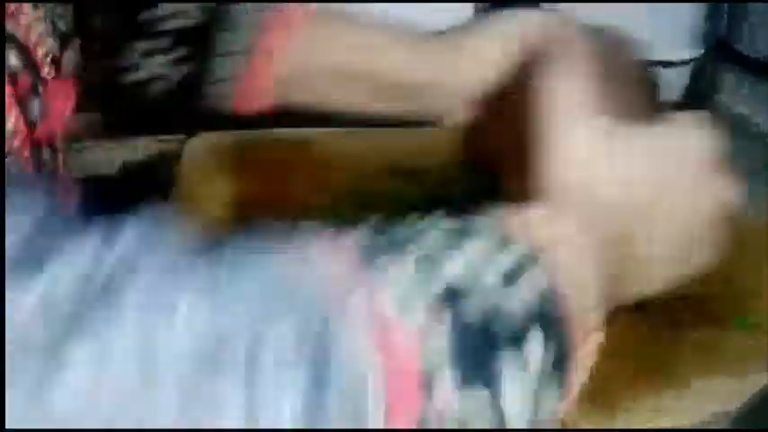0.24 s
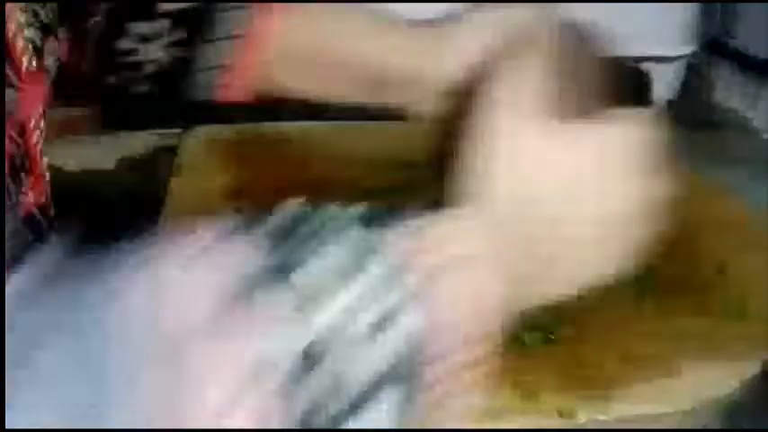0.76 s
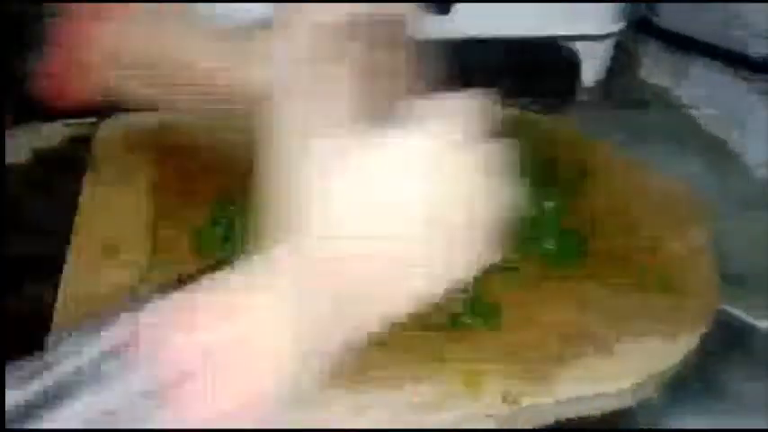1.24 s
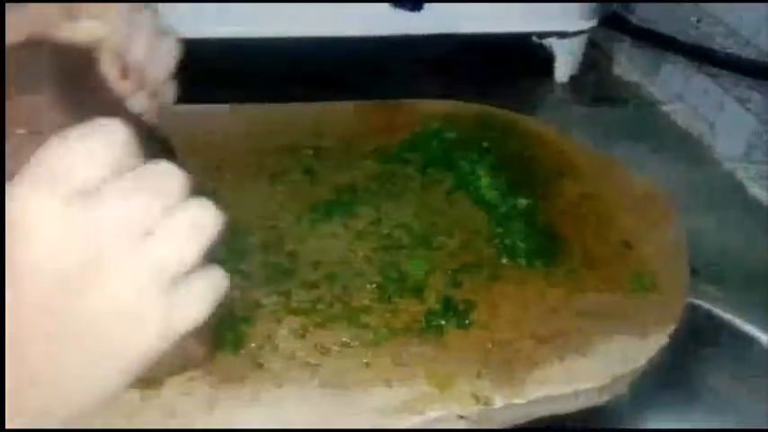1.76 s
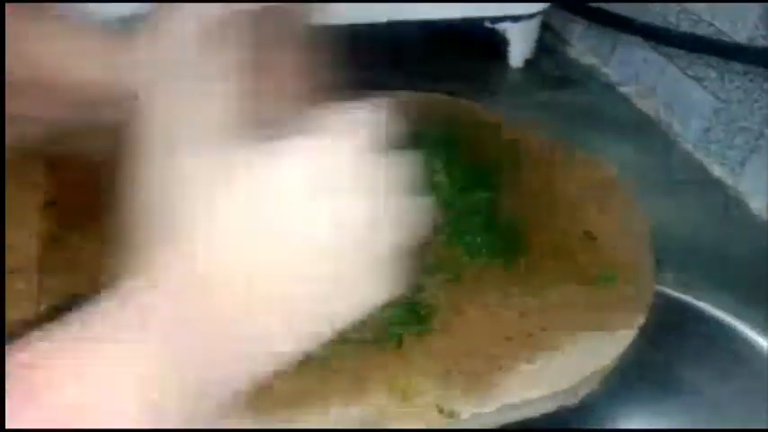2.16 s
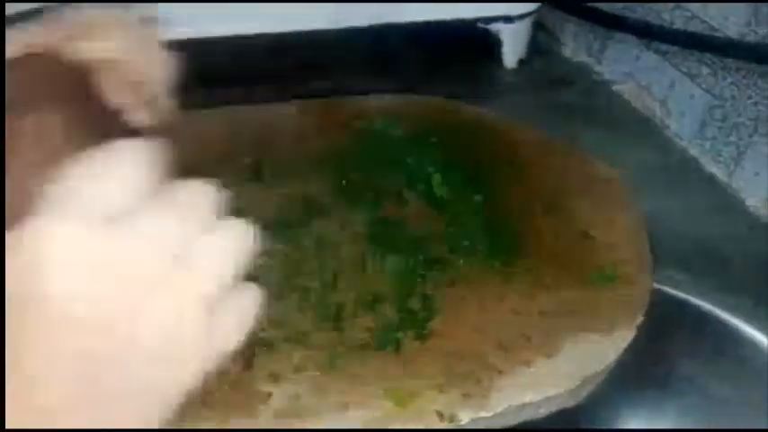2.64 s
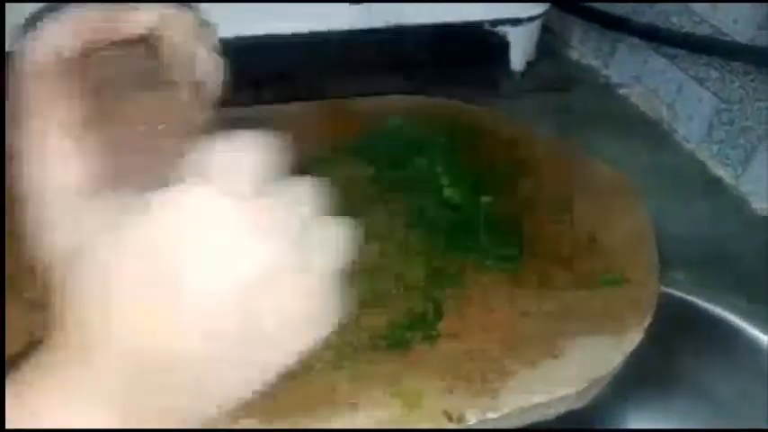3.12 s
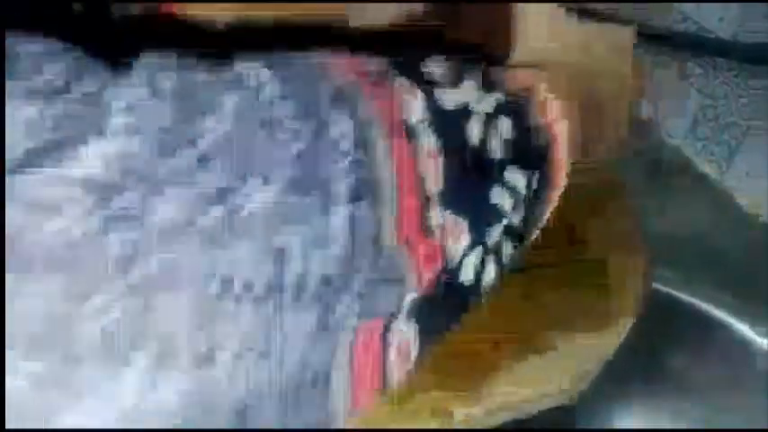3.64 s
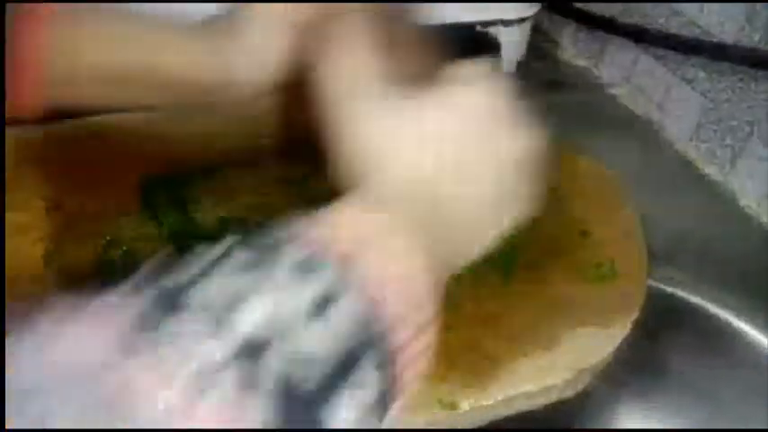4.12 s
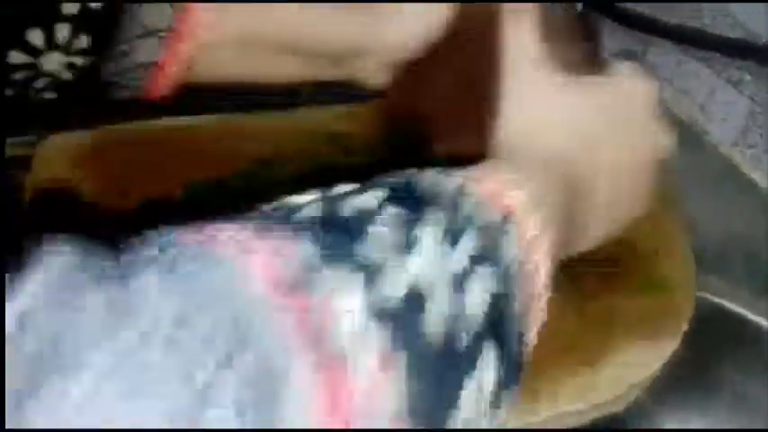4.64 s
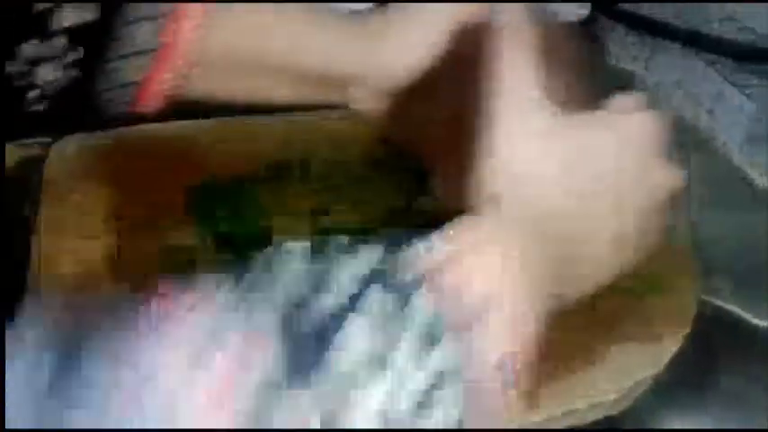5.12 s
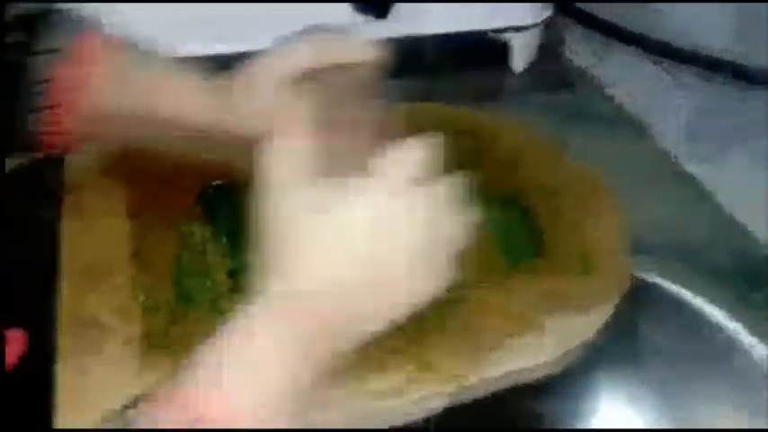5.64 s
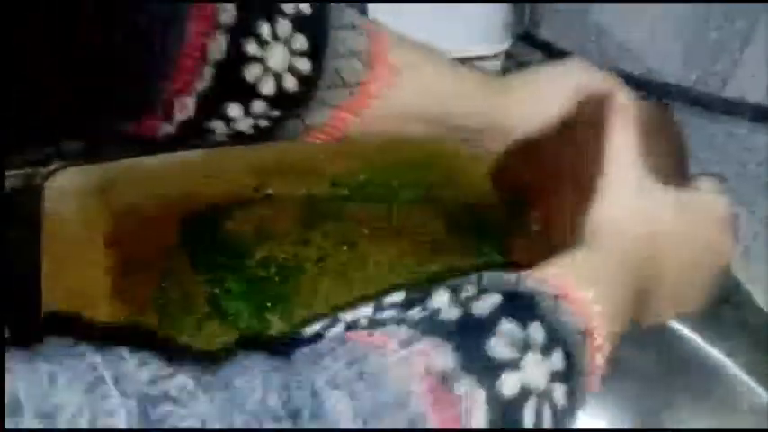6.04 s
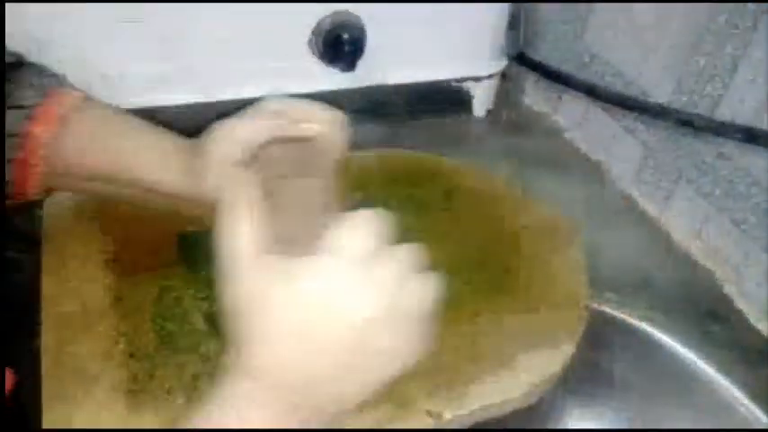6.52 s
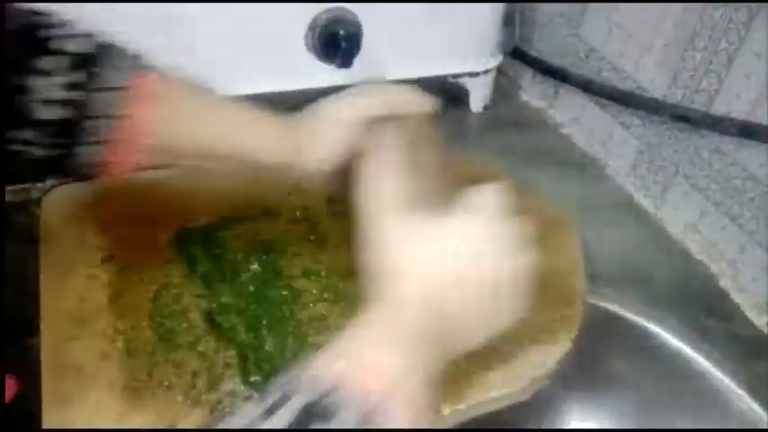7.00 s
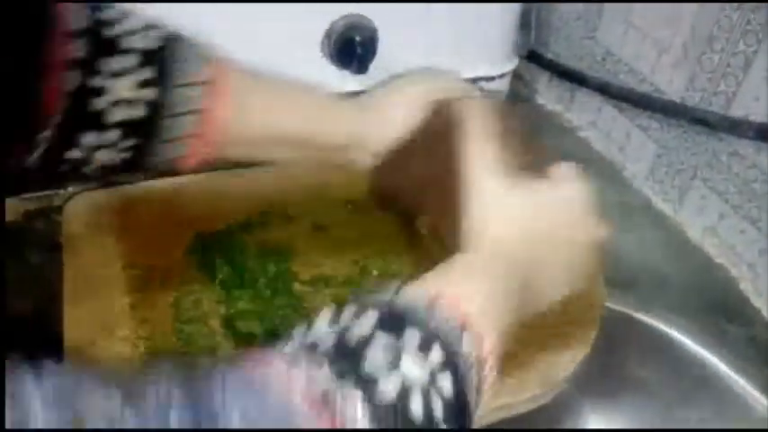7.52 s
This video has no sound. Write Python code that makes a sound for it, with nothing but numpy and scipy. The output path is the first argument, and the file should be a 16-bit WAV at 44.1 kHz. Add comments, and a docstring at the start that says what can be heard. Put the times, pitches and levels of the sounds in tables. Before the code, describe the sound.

Quick rough grinding strokes of stone over wet herbs on a heavy slab, with pauses, sharp stony clacks and small bright ticks.

```python
"""On a kitchen floor, close to a phone, a hand stone is pushed to and fro over wet herbs on a thick stone slab.
Crushed grit hisses as filtered noise and clicks; its jerky slips make the slab and the stone ring.
Now and then the stone is lifted and knocked down, and short ticks sound as bursts of bright noise.
The small hard room adds short, dull echoes; behind lie a low rumble, a faint hiss, a hoot and a rustle."""
import sys
import numpy as np
from scipy import signal
from scipy.fft import rfft, irfft, next_fast_len
from scipy.io import wavfile
from scipy.ndimage import uniform_filter1d

SR = 44100
rng = np.random.default_rng(int(sys.argv[2]) if len(sys.argv) > 2 else 0)


def bounce(signal):
    """Save signal as a 16-bit WAV file at the path given by the first command-line argument."""
    frames = np.transpose(np.atleast_2d(signal))
    limited = np.clip(frames, -1, 1)
    pcm = np.round(limited * 32767).astype(np.int16)
    wavfile.write(sys.argv[1], SR, pcm)


N = 342216

# One row per stroke of the stone: start t/s, speeding up t/s, steady t/s, slowing t/s;
# strongest slab boom, slab ring, stone ring, each t/s after the start;
# greatest force on grit, boom, slab ring, stone ring, each level/dB
STROKES = [(-0.021, 0.047, 0.0063, 0.11, 0.094, 0.087, 0.077, -47, -34.5, -49, -58.4),
           (0.146, 0.092, 0.0, 0.098, 0.061, 0.028, 0.17, -47, -34, -43.5, -52),
           (0.35, 0.098, 0.009, 0.08, 0.1, 0.13, 0.18, -47.5, -36, -48, -54),
           (0.555, 0.089, 0.0082, 0.12, 0.086, 0.05, 0.045, -48, -36.5, -44.7, -48),
           (0.776, 0.087, 0.0, 0.093, 0.054, 0.11, 0.12, -47, -34.5, -46.5, -53.5),
           (0.968, 0.039, 0.015, 0.085, -0.04, 0.0083, 0.013, -60.5, -49, -59, -72),
           (1.439, 0.071, 0.033, 0.15, 0.14, 0.057, 0.065, -48.3, -37, -47.5, -49),
           (1.703, 0.1, 0.0013, 0.08, 0.18, 0.14, 0.12, -45, -38.5, -51, -61),
           (1.89, 0.093, 0.023, 0.1, 0.13, 0.06, 0.05, -47, -39.5, -48.5, -53),
           (2.13, 0.0044, 0.08, 0.091, 0.078, 0.13, 0.11, -49.5, -39.5, -52.5, -58.5),
           (2.295, 0.073, 0.044, 0.098, 0.16, 0.098, 0.034, -49.5, -34.5, -48.5, -55.4),
           (2.514, 0.1, 0.0088, 0.098, 0.026, 0.14, 0.15, -49.5, -32.5, -53.5, -58.5),
           (2.66, 0.1, 0.0066, 0.026, -0.014, 0.033, 0.033, -67, -56.5, -73, -82),
           (3.254, 0.18, 0.055, 0.017, 0.1, 0.12, 0.066, -63, -42, -56.5, -53),
           (3.474, 0.04, 0.0046, 0.1, -0.019, 0.007, 0.07, -57.5, -59, -67, -71),
           (3.595, 0.056, 0.11, 0.057, 0.13, 0.14, 0.17, -54, -44.5, -57.5, -57),
           (3.867, 0.064, 0.0045, 0.18, 0.1, 0.13, 0.021, -49.5, -42, -55.7, -54.5),
           (4.03, 0.11, 0.0084, 0.127, 0.16, 0.15, 0.16, -50.5, -39, -55.5, -53),
           (4.269, 0.13, 0.0079, 0.1, 0.035, 0.054, 0.048, -51, -34.5, -51.5, -51.5),
           (4.496, 0.011, 0.11, 0.11, -0.1, 0.091, 0.13, -52, -34.7, -53, -57.8),
           (4.706, 0.13, 0.024, 0.1, 0.054, 0.14, 0.13, -49.5, -34, -56.5, -60),
           (4.946, 0.036, 0.046, 0.13, 0.14, 0.078, 0.11, -52, -38.5, -62.5, -61.8),
           (5.14, 0.07, 0.029, 0.11, 0.104, 0.135, 0.091, -52.5, -48.5, -63.5, -63.5),
           (5.314, 0.022, 0.0, 0.1, 0.00068, 0.002, 0.028, -58.5, -48.8, -69, -79),
           (5.694, 0.19, 0.0, 0.19, 0.2, 0.15, 0.097, -48, -36.5, -39.5, -44),
           (5.943, 0.051, 0.0046, 0.12, -0.039, 0.13, 0.019, -53.9, -35, -63, -58),
           (6.085, 0.09, 0.03, 0.11, 0.11, 0.17, 0.15, -50.5, -36.5, -47, -51.5),
           (6.318, 0.078, 0.063, 0.072, 0.17, 0.052, 0.04, -53, -35, -46.5, -50.5),
           (6.501, 0.09, 0.012, 0.17, 0.14, 0.12, 0.15, -50, -36, -49.5, -52),
           (6.739, 0.15, 0.018, 0.057, 0.09, 0.15, 0.062, -47, -32.5, -51.5, -49.5),
           (6.948, 0.032, 0.089, 0.081, 0.099, 0.096, 0.1, -50.3, -34, -51, -58),
           (7.085, 0.062, 0.026, 0.17, 0.16, 0.15, 0.165, -52, -43, -61.5, -61.5),
           (7.347, 0.075, 0.013, 0.14, 0.0043, 0.091, 0.028, -53.5, -41.1, -61.5, -59),
           (7.525, 0.04, 0.019, 0.18, 0.16, 0.12, 0.12, -54.5, -43, -56.5, -63)]
# The stone's edge drags dry and crunches: start t/s, swell t/s, fade t/s,
# force on the lower pair of modes level/dB, on the upper pair level/dB
CRUNCHES = [(5.73, 0.076, 0.22, -51, -55), (6.325, 0.04, 0.029, -65, -64)]
# The stone meets the slab: t/s, push below the split level/dB, push above it level/dB,
# boom push level/dB, crack level/dB, fading of the rattle t/ms
KNOCKS = [(0.442, -38, -38, -29, -33, 8.9), (1.353, -5, -4, -13, -23.5, 3.6),
          (1.483, -25, -27, -28.5, -57, 6.7), (2.418, -55.5, -49, -31, -52, 5.1),
          (3.113, -15.5, -16, -21, -35.5, 3.4), (3.304, -52, -57.5, -43.5, -50, 5),
          (4.765, -42.5, -44, -26.5, -44.5, 2.3), (5.654, -8, -12, -11.5, -29, 4.4),
          (6.374, -25, -24.5, -28, -57, 4.2), (7.021, -44, -41.5, -33, -45, 6.3)]
# Short bright ticks: t/s, level/dB
TICKS = [(0.587, -52), (1.3238, -48.5), (1.7976, -49), (2.135, -58), (2.324, -61), (2.472, -48),
         (2.576, -51.5), (3.623, -48.5), (4.304, -59), (4.505, -46), (4.863, -37.5), (4.968, -48),
         (7.4185, -50), (7.5574, -43.5)]
# Ringing modes: f/Hz, knocked level/dB, rubbed level/dB, time to fall 60 dB before extra damping t/s
SLAB_BOOM = [(128, -28.5, -18.5, 0.44), (185.6, -6, -1, 0.42), (229.4, 2, 2, 0.19), (291, -1, -10.5, 0.084),
             (335.3, -4.5, -13, 0.17), (387.6, -2.5, -15, 0.38), (452.3, -10.5, -19, 0.17)]  # low modes of the slab
SLAB_RING = [(591.5, -16.5, -6, 0.053), (721, -5.5, -12.5, 0.083), (799, -15.5, -4, 0.049),
             (859, -6, 0, 0.052), (967, -2.5, -4.5, 0.064), (1039, 0, -7.5, 0.1), (1209, -5, -16.5, 0.14),
             (1313, 4, -18.5, 0.16), (1524, -12.5, -14.5, 0.2), (1590, 4, -12.5, 0.25),
             (1664, -7, -1, 0.042), (1754, -9.5, -15, 0.035)]  # middle modes of the slab
STONE_RING = [(1908, 2.5, -8, 0.12), (2073, -11.5, -10, 0.13), (2225, -11.5, -2.5, 0.086),
              (2300, -15.5, 0, 0.068), (2417, -11.5, -9, 0.085), (2735, -22, -15.5, 0.027),
              (3030, -19.5, -10.5, 0.051), (3260, -28.5, -10, 0.046), (3695, -27.5, -7.5, 0.039)]  # modes of the hand stone
# Modes of the dragging edge: f/Hz, level/dB, time to fall 60 dB before extra damping t/s
EDGE_LOW = [(3140, 0, .02), (3460, -2, 0.023)]
EDGE_HIGH = [(6200, -2, 0.016), (5970, 0, 0.0141)]
# Modes of the background hum: f/Hz, level/dB, time to fall 60 dB before extra damping t/s
HUM_MODES = [(66, 0, .5), (100, -4, .5)]
# Tone colour as a filter curve: f/Hz, level/dB
GRIT_COLOUR = [(290, -40), (500, -2.5), (682, -25), (850, -3.5), (1320, -11), (1620, 4.5), (2270, -20.5),
               (2580, -5), (5610, -2.5), (9670, -4), (11000, -8.5), (14300, -12), (22000, -120)]
THUD_COLOUR = [(260, -27), (450, -16), (578, -12), (834, 1.5), (1150, 6), (1610, 3.5), (2000, -15),
               (2180, -12.5), (2380, -24), (4500, -45), (5850, -59.5), (9900, -120)]
AIR_COLOUR = [(24, -40), (40, -14.5), (107, -18), (139, -12), (156, -25), (193, -22), (494, -39),
              (720, -39), (978, -35.5), (2390, -41), (2560, -39.5), (2810, -45.5), (5970, -51.5),
              (7380, -44), (11000, -67.5), (14300, -100), (22000, -120)]  # the faint background hiss, strongest in the bass
# The hoot's tone and overtones: multiple of its lowest frequency, level/dB
HOOT_ORDERS = [(1, 2.5), (2, -9.5), (3, -20.5)]
# The stone's sound drops abruptly once, ring and all: t/s, level/dB
DROP = [(7.086, -1.5), (7.096, -16), (7.15, -8), (7.19, -6)]
# Background loudness over time: t/s, level/dB
AIR_LEVEL = [(0, -56), (1.2, -64.5), (2.95, -67.5), (5.55, -62.5), (7.76, -59)]
WOBBLE_LEVEL = [(0.0, -53), (0.24, -67), (1.58, -49), (1.79, -63), (2.9, -71), (3.0, -55.5), (3.28, -79),
                (3.57, -61.5), (5.81, -57.5), (6.33, -62), (6.74, -46), (7.15, -70), (7.41, -64),
                (7.76, -65)]  # the deepest wobble
HUM_LEVEL = [(0.0, -69), (0.37, -62), (1.32, -62.5), (1.36, -51), (1.49, -65), (2.64, -64), (2.83, -80),
             (3.11, -66), (3.31, -78), (3.69, -69), (4.56, -70), (4.65, -60), (5.47, -70), (5.75, -51.5),
             (6.09, -56.5), (6.16, -66), (7.22, -52.5), (7.33, -66), (7.5, -48.5), (7.76, -64)]

# how steeply each sound follows the speed (exponent)
HISS_POWER, BOOM_POWER, RING_POWER, STONE_POWER = 2.52, 1.5, 1.1, 0.97
# boom, slab ring and stone ring each swell once a stroke: width in s, depth in dB
SWELL_S, SWELL_DB = (.06, 0.048, .05), (9.5, 11, 12)
# centre of the lifted part of the hiss at rest and at full speed; share it sinks by while the stone rings
SLOW_GRIT_HZ, FAST_GRIT_HZ, RING_DULLS = 4860, 6230, .15
ROOM_T60_S, ROOM_TOP_HZ, ROOM_DB = 0.42, 2500., -18
# middle of the sound, time from there to 1/e of its strength
HOOT_S, HOOT_WIDTH_S, HOOT_HZ, HOOT_DB = 3.035, .04, 1000, -66.5
RUSTLE_S, RUSTLE_WIDTH_S, RUSTLE_DB = 1.2, .05, -72.5
TOP_HZ = 10950


def grinding():
    """Fine grit hisses straight to the air; coarser slips shake slab and stone."""
    edge_low_db, edge_high_db = crunch()
    (hiss_db, boom_db, ring_db, stone_db), loudest_hz = strokes()
    hiss = undb(hiss_db) * grit(loudest_hz)
    boom = rubbed(SLAB_BOOM, column=2, force_db=boom_db, rate=1200, wander_db=1.32, damped=.7)
    slab = rubbed(SLAB_RING, column=2, force_db=ring_db, rate=1500, wander_db=2.5, damped=0.49)
    stone = rubbed(STONE_RING, column=2, force_db=stone_db, rate=1300, wander_db=4.0, damped=0.29)
    edge_low = rubbed(EDGE_LOW, column=1, force_db=edge_low_db, rate=760, wander_db=1.0, damped=1.)
    edge_high = rubbed(EDGE_HIGH, column=1, force_db=edge_high_db, rate=700, wander_db=0.0, damped=0.98)
    return hiss + boom + slab + stone + edge_low + edge_high


def strokes():
    """Force on grit, boom, slab and stone, and the hiss centre: speed drives all, each set of modes swells once."""
    power = np.full((4, N), 1e-11)  # a tiny floor keeps the logarithm finite
    weighted_hz = np.full(N, 1e-11 * SLOW_GRIT_HZ)
    steep = np.array([HISS_POWER, BOOM_POWER, RING_POWER, STONE_POWER])[:, None]
    for start, rise, hold, fall, boom_s, ring_s, stone_s, *db in STROKES:
        at, speed = arch(start, rise, hold, fall)
        t = at / SR - start
        swells = [np.exp(-((t - s) / width) ** 2) for s, width in zip((boom_s, ring_s, stone_s), SWELL_S)]
        swell_db = [depth * (shape - 1) for shape, depth in zip(swells, SWELL_DB)]
        extra_db = [0 * at] + swell_db  # the hiss has no swell of its own
        gains = undb(np.array(db)[:, None] + extra_db) * speed ** steep
        power[:, at] += gains ** 2
        hz = SLOW_GRIT_HZ + (FAST_GRIT_HZ - SLOW_GRIT_HZ) * speed ** 2
        hz = hz * (1 - RING_DULLS * swells[-1])
        # where strokes overlap, the stronger hiss counts for more
        weighted_hz[at] += hz * gains[0] ** 2
    return 10 * np.log10(power), weighted_hz / power[0]


def arch(start, rise, hold, fall):
    """Eases from 0 up to 1, holds, eases back; returns the samples it covers and its shape."""
    end = start + rise + hold + fall
    at = np.arange(max(int(start * SR), 0), min(int(end * SR), N))
    t = at / SR - start
    ramp = np.minimum(t / rise, (rise + hold + fall - t) / fall)
    return at, np.sin(np.pi / 2 * np.clip(ramp, 0, 1))


def grit(loudest_hz, lift_db=4.0, spread_octaves=0.56):
    """Crushed grains, clumped differently in each third of an octave; one moving region is lifted."""
    out = 0
    together_db = 1.5 * walk(54) + 1.5 * walk(250)
    crackle = grains(rate=500, spread_db=4.5)
    step = 2 ** (1 / 3)
    for hz in 450 * step ** np.arange(15):
        own_clicks = grains(rate=580, spread_db=3.5)
        crush = rng.standard_normal(N) + .6 * own_clicks + 0.39 * crackle
        clump_db = 2.0 * walk(40) + 1.8 * walk(12)
        bump_db = lift_db * np.exp(-(np.log2(hz / loudest_hz) / spread_octaves) ** 2)
        gain = undb(together_db + clump_db + bump_db)
        out = out + gain * band(crush, hz / np.sqrt(step), hz * np.sqrt(step))
    return unit(colour(out, GRIT_COLOUR))


def rubbed(modes, column, force_db, rate, wander_db, damped):
    """Stick-slip jerks, as strong as the given force, shake a set of modes that rings on afterwards."""
    slips = grains(rate, spread_db=2.5) * undb(1.2 * walk(25))
    # loudness under even noise, so that the force sets the level
    steady = np.std(ring(rng.standard_normal(SR), modes, column, damped=damped))
    return ring(slips * undb(force_db), modes, column, wander_db, damped) / steady


def crunch():
    """Force of the dragging edge on its two pairs of modes, in dB."""
    force = np.full((2, N), 1e-6)  # a tiny floor keeps the logarithm finite
    for start, swell, fade, *db in CRUNCHES:
        at, shape = arch(start, swell, 0, fade)
        force[:, at] += undb(db)[:, None] * shape ** 2
    return 20 * np.log10(force)


def knocks(rattle=0.32, crack_ms=9.1, tail_ms=21.0, tail_db=-7.5, split_hz=1637.0):
    """A first contact and a short rattle ring the modes; many weak modes blur into a thud; a crack on top."""
    rough = unit(colour(rng.standard_normal(N), THUD_COLOUR))
    rough_low = unit(band(rough, 280.0, split_hz))
    rough_high = unit(band(rough, split_hz, 8100.0))
    ring_push, boom_push, thud, crack = np.zeros((4, N))
    t = np.arange(8192) * 1000 / SR  # in ms
    for s, low_db, high_db, boom_db, crack_db, rattle_ms in KNOCKS:
        at = slice(int(s * SR), int(s * SR) + len(t))
        rattle_noise, crack_noise = rng.standard_normal((2, len(t)))
        push = rattle * rattle_noise * np.exp(-t / rattle_ms) / np.sqrt(rattle_ms * SR / 1000)
        push[0] += 1  # the first contact
        ring_push[at] += undb(low_db) * band(push, 300., split_hz)
        ring_push[at] += undb(high_db) * band(push, split_hz, 4000.0)
        # the heavy low modes get one smooth push without rattle
        boom_push[at] += undb(boom_db) * np.exp(-t / 0.22) / (.6 * SR / 1000)
        body = np.exp(-t / (2.2 * rattle_ms))
        tail = undb(tail_db) * np.exp(-t / tail_ms)
        fade = np.clip(t / 1.7, 0, 1) * (body + tail)
        thud[at] += fade * (undb(low_db) * rough_low[at] + undb(high_db) * rough_high[at])
        # loose grit keeps trickling after the crack
        trickle = undb(-19.5) * np.exp(-t / 91.0)
        crack[at] += undb(crack_db) * crack_noise * (np.exp(-t / crack_ms) + trickle)
    ringing = undb(-14.0) * ring(ring_push, SLAB_RING + STONE_RING, column=1)
    booming = undb(1.5) * ring(boom_push, SLAB_BOOM, column=1)
    return ringing + booming + undb(-1.5) * thud + undb(-8.5) * band(crack, 3900.0, 10000.0)


def ticks(decay_ms=4.2):
    """Each tick is a bright burst of noise that fades in a few ms."""
    out, t = np.zeros(N), np.arange(1024) / SR
    for s, db in TICKS:
        first = int(s * SR)
        burst = rng.standard_normal(len(t)) * np.exp(-t * 1000 / decay_ms)
        out[first:first + len(t)] += undb(db) * burst
    return signal.sosfilt(signal.butter(1, 1500., "high", fs=SR, output="sos"), out)


def room(x):
    """Adds the dense echoes of hard walls, dull and short, as fading noise."""
    t = np.arange(SR // 2) / SR
    fade = np.exp(-np.log(1000) * t / ROOM_T60_S) * np.clip(t / 0.0079, 0, 1)
    tail = rng.standard_normal(len(t)) * fade
    tail = signal.sosfilt(signal.butter(1, ROOM_TOP_HZ, fs=SR, output="sos"), tail)
    tail = tail / np.sqrt(np.sum(tail ** 2))
    return x + undb(ROOM_DB) * signal.fftconvolve(x, tail)[:N]


def hoot():
    """A faint far-off hoot: a soft tone with two overtones that swells and fades."""
    t = np.arange(N) / SR - HOOT_S
    swell = undb(HOOT_DB) * np.exp(-(t / HOOT_WIDTH_S) ** 2)
    return swell * sum(undb(db) * np.sin(k * 2 * np.pi * HOOT_HZ * t) for k, db in HOOT_ORDERS)


def rustle():
    """A faint, brief, soft hiss while the stone is lifted: a narrow band of noise."""
    swell = np.exp(-((np.arange(N) / SR - RUSTLE_S) / RUSTLE_WIDTH_S) ** 2)
    return undb(RUSTLE_DB) * swell * unit(band(rng.standard_normal(N), 4200., 5000.0))


def rumble():
    """A deep wobble and a wavering hum swell and sink; a faint hiss changes more gently. All are filtered noise."""
    wobble = unit(band(band(rng.standard_normal(N), 18.0, 21.0), 7.0, 36.0))
    hum = unit(ring(rng.standard_normal(N), HUM_MODES, column=1, wander_db=2.5))
    hiss = unit(colour(rng.standard_normal(N), AIR_COLOUR))
    deep = undb(curve(WOBBLE_LEVEL, column=1)) * wobble + undb(curve(HUM_LEVEL, column=1)) * hum
    return deep + undb(curve(AIR_LEVEL, column=1)) * hiss


def ring(x, modes, column, wander_db=0., damped=0.8):
    """Sum of decaying modes; wander feeds each now more, now less; damped multiplies the ringing time."""
    out = 0
    for k, row in enumerate(modes):
        turn = 2 * np.pi * row[0] / SR  # angle per sample
        fade = np.exp(-np.log(1000) / (damped * row[-1] * SR))  # factor kept per sample
        feed = x * undb(wander_db * walk(9)) if wander_db else x
        tone = signal.lfilter([0, fade * np.sin(turn)], [1, -2 * fade * np.cos(turn), fade ** 2], feed)
        out = out + (-1) ** k * undb(row[column]) * tone  # neighbours get opposite signs
    return out


def grains(rate, spread_db):
    """Random clicks, on average rate per second, a few much larger than the rest."""
    there, size, sign = rng.random((3, N))
    height = undb(-spread_db * np.log(size + 1 / N))
    return unit((there < rate / SR) * height * np.sign(sign - .5))


def walk(rate, size=8):
    """Random levels that glide to a new value every 1 / rate s; spread near 1."""
    steps = np.repeat(rng.standard_normal(int(N / SR * rate) + 2), size)
    smooth = unit(uniform_filter1d(uniform_filter1d(steps, size), size))
    return np.interp(np.arange(N) * (rate * size / SR), np.arange(len(smooth)), smooth)


def band(x, low_hz, high_hz, order=2):
    """Keeps the frequencies between two limits."""
    return signal.sosfilt(signal.butter(order, [low_hz, high_hz], "band", fs=SR, output="sos"), x)


def colour(x, spectrum):
    """Shapes the spectrum by (Hz, dB) points joined on a logarithmic frequency axis."""
    hz, db = np.transpose(spectrum)
    size = next_fast_len(N)
    axis = np.log(np.arange(size // 2 + 1) * SR / size + 1)
    gain = undb(np.interp(axis, np.log(hz), db))
    return irfft(rfft(x, size) * gain, size)[:N]


def curve(rows, column, silent_db=-110):
    """One column joined by straight lines over time; silent_db outside the table."""
    rows = np.array(rows)
    return np.interp(np.arange(N) / SR, rows[:, 0], rows[:, column], silent_db, silent_db)


def unit(x):
    """Scales to an average strength (rms) of 1."""
    return x / np.sqrt(np.mean(x ** 2))


def undb(db):
    """Turns dB into a plain factor."""
    return 10 ** (np.asarray(db) / 20)


def scene():
    """Stone sounds and ticks in the room over the background."""
    stone = room(grinding() + knocks() + ticks())
    stone = stone * undb(curve(DROP, column=1, silent_db=0))
    return (stone + hoot() + rustle() + rumble())[None]


def record(dry):
    """The phone cuts the top with a steep low-pass filter."""
    return signal.sosfilt(signal.ellip(10, .2, 60, TOP_HZ, fs=SR, output="sos"), dry)


dry = scene()
out = record(dry)
bounce(out)
```